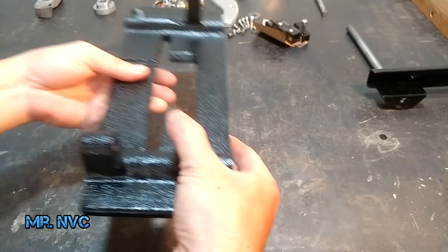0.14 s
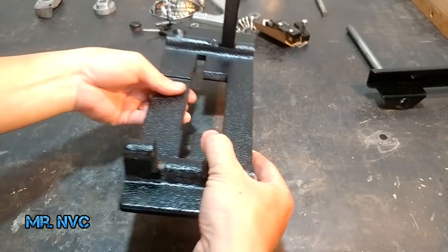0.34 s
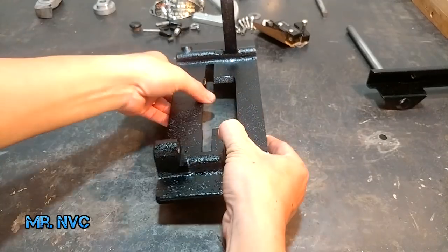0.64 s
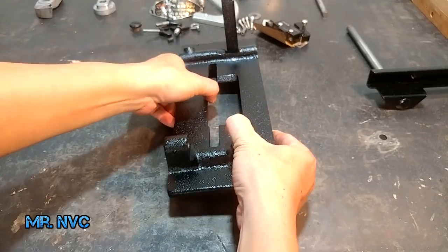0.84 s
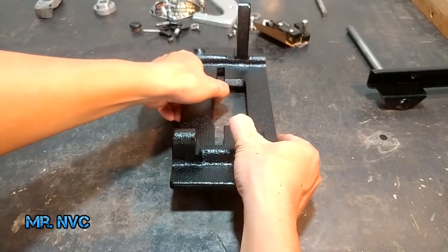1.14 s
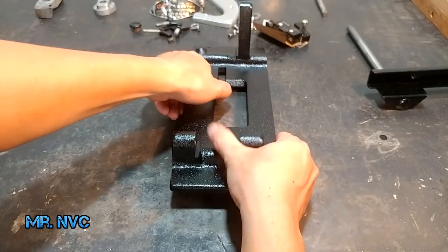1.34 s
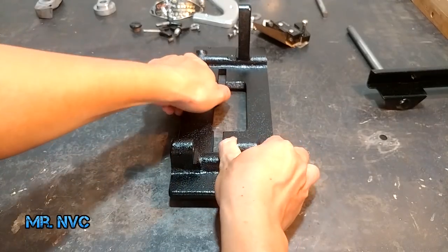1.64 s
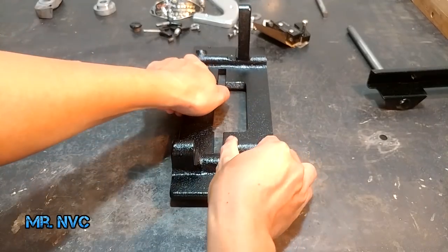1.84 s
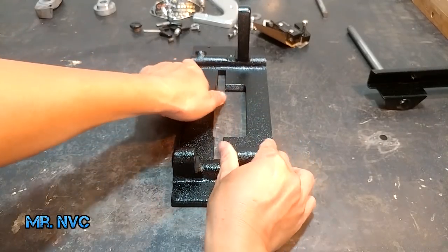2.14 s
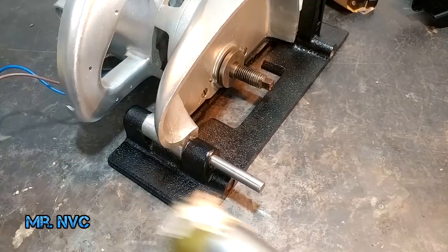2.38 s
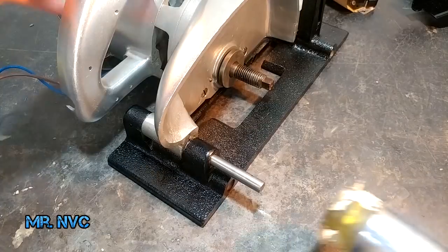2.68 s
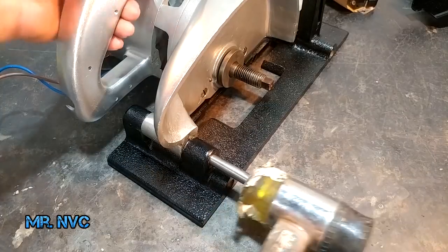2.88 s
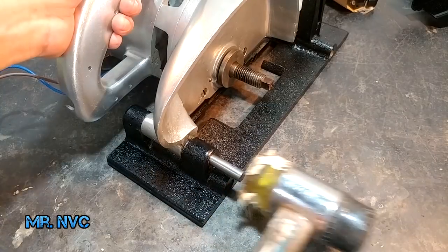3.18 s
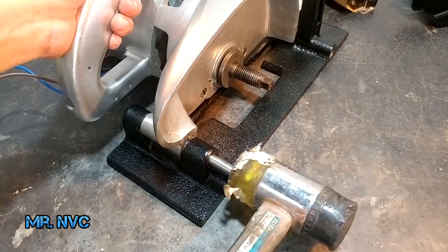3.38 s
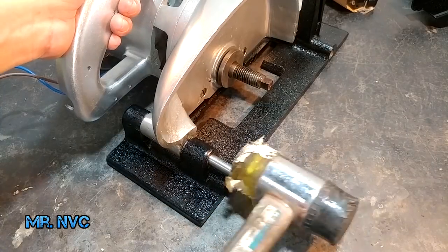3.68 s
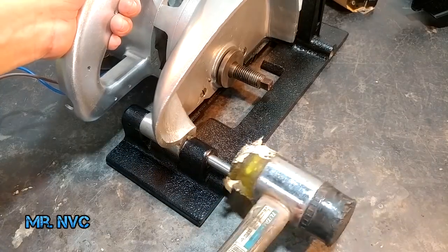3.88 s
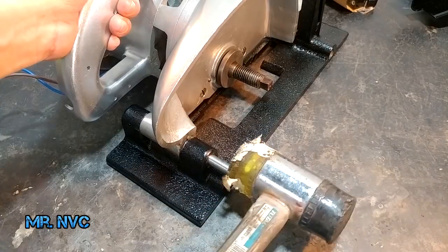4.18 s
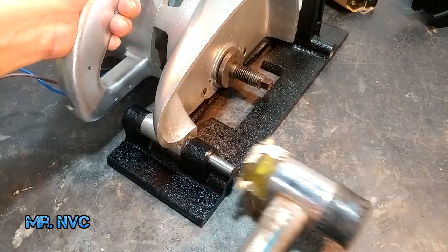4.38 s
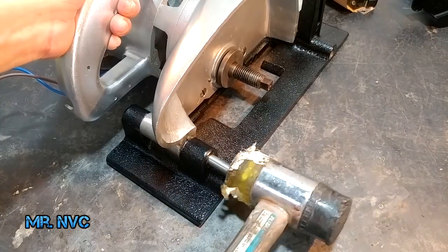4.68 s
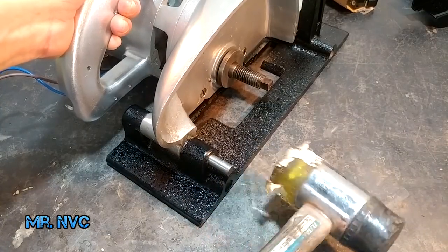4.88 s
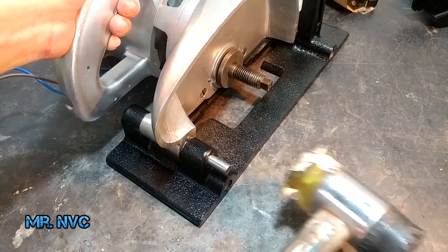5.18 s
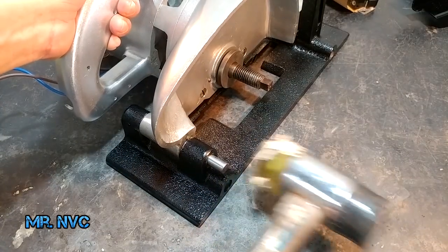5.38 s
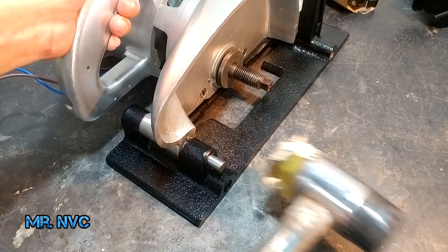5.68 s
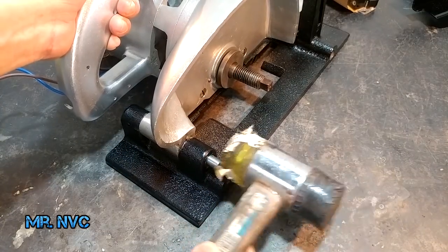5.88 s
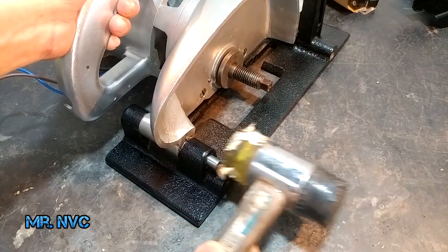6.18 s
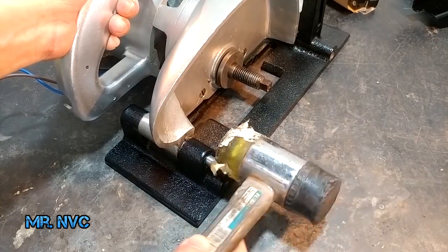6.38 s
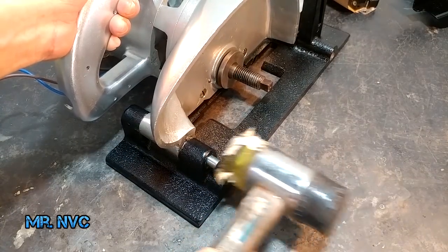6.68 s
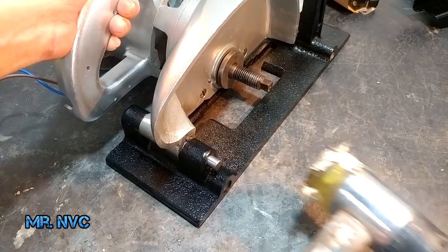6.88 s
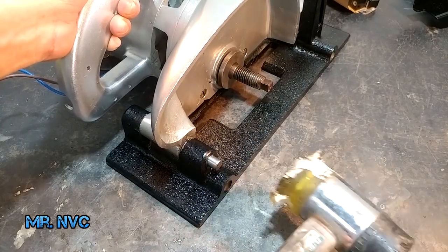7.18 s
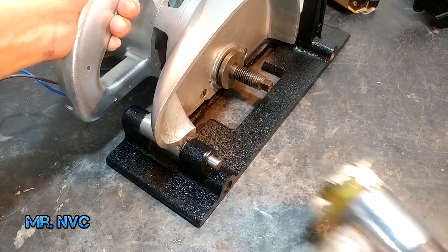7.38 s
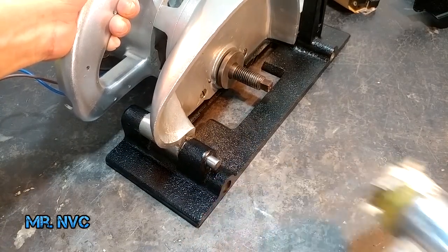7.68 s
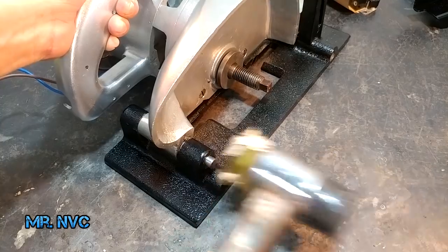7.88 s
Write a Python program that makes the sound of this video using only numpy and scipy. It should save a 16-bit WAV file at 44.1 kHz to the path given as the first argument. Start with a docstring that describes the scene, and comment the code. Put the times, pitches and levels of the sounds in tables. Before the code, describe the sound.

In a small workshop with faint traffic outside, a hinged metal plate scrapes softly and clanks down twice on a bench. After an abrupt cut, a soft-faced mallet taps a loose steel pin, which pings higher with each of the first taps. Firm, steady knocks follow, ringing the cast base. The last heavy blows rattle the whole saw and make the bench boom. The sound is close, with a short room ring.

```python
"""A small workshop, far traffic outside. A cast saw base is handled on the bench; its hinged plate slides
and clanks down twice. After an abrupt cut, a soft-faced mallet drives the steel hinge pin home.
Light blows knock and ring the casting, and the pin pings while still loose. Heavy ones jolt the whole
saw, which rattles and makes the bench boom. The room rings after each; a limiter holds the peaks."""
import sys
import numpy as np
from scipy import signal
from scipy.fft import rfft, irfft, next_fast_len
from scipy.io import wavfile
from scipy.ndimage import uniform_filter1d, minimum_filter1d

SR = 44100
rng = np.random.default_rng(int(sys.argv[2]) if len(sys.argv) > 2 else 0)


def unload_audio(sound):
    """Save the sound as a 16-bit wav file, at the path given as the first command line argument."""
    columns = np.transpose(np.atleast_2d(sound))
    # keep every value between -1 and 1, then stretch to whole-number steps
    steps = np.round(np.clip(columns, -1, 1) * 32767)
    wavfile.write(sys.argv[1], SR, steps.astype(np.int16))


N = 354563
EVENT_SAMPLES = 32768
TIME_S, AGE_S = np.arange(N) / SR, np.arange(EVENT_SAMPLES) / SR
GRIP_S = 4.4   # the bore grips the pin from here on

# Mallet on pin. Each row: start in seconds, knock in dB, ring in dB, ring tilt in dB/octave, jolt 0-1.
BLOWS = [(2.9269, -15, -25.5, .5, 0), (3.197, -17, -31.5, 1, 0), (3.4484, -24, -33, 1, 0),
         (3.7050, -32, -24.5, -2.5, 0.1), (3.9558, -17, -19, -1.5, 0.24), (4.2022, 0, -11.5, 1, 0.5),
         (4.6548, 1.5, -17.5, .5, 0.04), (5.0460, -2, -20, -.5, 0.03), (5.334, -2.5, -21.5, -.5, 0.01),
         (5.6107, -2.5, -24, -0.5, 0), (5.8805, -3.5, -24.5, -.5, 0), (6.1421, -2.5, -21, -1, 0.23),
         (6.3988, -7, -17, 3.5, .54), (6.668, 3, -15, 4, 0.55), (7.5419, -1, -12.5, 1.5, 1),
         (7.9035, 6.5, -11.5, 3, .86)]


def mallet(ripple, contact_s=0.00067, build_s=0.0011, early_db=5.5):
    """Each blow knocks the pin, damped by the mallet face; the casting rings and the saw body thuds."""
    # Each row: mode in Hz, level in dB, t60 in seconds.
    pin_modes = [(573, -10, 0.0096), (960, -12.5, 0.019), (1833, -14.5, 0.023), (2390, -0.5, 0.0096),
                 (2650, -1.5, 0.0072), (3330, -5, 0.0074), (4760, -4.5, 0.0067), (6240, -5.5, 0.0051),
                 (7970, -7, 0.0054)]
    base_modes = [(136, -9.5, 0.43), (285.6, -15, 0.29), (358.3, -8, 0.33), (468, -7.5, 0.31),
                  (657, -19, 0.47), (783, -16, 0.19), (1030, -17, 0.11), (1787, -11.5, 0.25),
                  (2840, -9, 0.22), (3510, -13, 0.25), (5620, -11, 0.14), (7470, -19.5, 0.18)]
    # Each row: frequency in Hz, spectral density in dB.
    casting_spectrum = [(80, -13), (140, -4.5), (220, -5), (500, -0.5), (950, -3), (1300, -4), (1750, -5.5),
                        (2050, -8.5), (2600, -4), (4000, -8.5), (4800, -7), (8200, -6), (10500, -19.5),
                        (16000, -46)]
    thud_spectrum = [(150, -4), (230, -4), (290, 4), (400, -14), (520, 1), (750, 8), (880, 5.5),
                     (1100, -27), (2000, -26)]
    out = np.zeros(N)
    for start_s, knock_db, ring_db, tilt_db, _ in BLOWS:
        knock = struck(pin_modes, spread_db=0.5, detune=0.01) * attack(contact_s)
        ring = room_decay(coloured(resonant_noise(ripple), casting_spectrum, tilt_db))
        ring *= from_db(early_db * decay(0.12))   # near reflections
        ring += from_db(0.5) * struck(base_modes, spread_db=3, detune=0.0025)
        thud = room_decay(coloured(resonant_noise(ripple), thud_spectrum)) * decay(0.52)
        thud *= from_db(0.5 if start_s < GRIP_S else -5)   # stronger while the pin gives way
        body = (ring + thud) * attack(build_s)
        add(out, start_s, from_db(knock_db) * knock + from_db(ring_db) * body)
    return out


def loose_pin(ripple_free_db=5, chime_db=3.5, loss_db_per_tap=3.5):
    """The loose pin chimes in the bore on the first taps and pings higher as its free end shortens."""
    # One pitch per tap.
    pings_hz = [2380, 3560, 4250]
    # Each row: mode in Hz, level in dB, t60 in seconds.
    chime_modes = [(550, -8, 0.045), (880, 0, 0.032), (1950, 3, 0.022), (8080, 4, 0.12), (8650, -4, .08),
                   (8880, -1, 0.12), (9660, -5, .07), (10430, -5, 0.065), (11600, -16, .07)]
    out = np.zeros(N)
    for tap, ((start_s, _, ring_db, *_), hz) in enumerate(zip(BLOWS, pings_hz)):
        ping = from_db(ripple_free_db) * np.sin(2 * np.pi * hz * AGE_S) * decay(0.07)
        chime = from_db(chime_db - loss_db_per_tap * tap) * struck(chime_modes, spread_db=1)
        add(out, start_s, from_db(ring_db) * (ping + chime))
    return out


def jolted_saw(ripple, max_lag_s=0.012, full_rattle_s=0.043):
    """The saw jumps, rattles and rocks the bench; a harder jolt rattles sooner, louder and longer."""
    out = np.zeros(N)
    for start_s, *_, jolt in BLOWS:
        if jolt > 0:
            rattle = iron_clash(ripple, full_rattle_s * jolt, tilt_db=-0.07)
            boom = from_db(-16.5 if start_s < GRIP_S else -13) * bench_boom(hold_s=0.072)
            add(out, start_s + max_lag_s * (1 - jolt ** 2), jolt * (rattle + boom))
    return out


def handled_iron(ripple, full_chatter_s=0.031):
    """Hands clank the loose parts together and rock the base on the bench."""
    # Each row: start in seconds, level in dB, hold in seconds.
    clanks = [(1.1660, -1, 0.022), (1.419, -35, .0024), (1.472, -17, 0.0064), (1.548, -27.5, 0.0046),
              (1.886, -34, 0.0055), (1.904, -32, 0.0044), (2.1042, -22, .002), (2.12, -13, 0.009),
              (2.1330, -10, .037), (6.341, -32.5, 0.0014)]
    rocks = [(1.166, -24, 0.053), (1.485, -22.5, .028), (2.135, -19.5, 0.081), (2.3, -28.5, 0.054)]
    out = np.zeros(N)
    for start_s, level_db, hold_s in clanks:
        tilt_db = 1.35 * np.log2(full_chatter_s / hold_s)   # briefer is thinner
        add(out, start_s, from_db(level_db) * iron_clash(ripple, hold_s, tilt_db))
    for start_s, level_db, hold_s in rocks:
        add(out, start_s, from_db(level_db) * bench_boom(hold_s))
    return out


def iron_clash(ripple, hold_s, tilt_db):
    """A quick run of hard contacts rings the steel plate and fills the room with a bright crash."""
    # Each row: frequency in Hz, spectral density in dB.
    iron_spectrum = [(80, -8), (200, -6), (350, -1), (750, -2), (1400, -3), (2000, -5.5), (3200, -3.5),
                     (4300, -5), (6000, -1), (7900, 2), (9300, -5.5), (11500, -16.5), (16000, -29)]
    # Each row: mode in Hz, level in dB, t60 in seconds.
    plate_modes = [(808, -20, 0.31), (1235, -20, 0.32), (1650, -25, 0.33), (4190, -20, 0.15),
                   (5240, -30, 0.25), (5540, -9, 0.11), (6950, -14, 0.083), (8330, -16.5, 0.37),
                   (8220, -12, 0.16)]
    contacts = impulses(EVENT_SAMPLES, per_s=500)
    ticks = from_db(-14.5) * coloured(contacts, iron_spectrum, tilt_db) * decay(0.077, hold_s)
    crash = room_decay(coloured(resonant_noise(ripple), iron_spectrum, tilt_db), hold_s)
    plate = struck(plate_modes, spread_db=3.5, detune=0.002)
    return (ticks + crash + plate) * attack(0.00022)


def bench_boom(hold_s, settle_t60_s=0.12, room_db=-10.5, room_t60_s=1.0):
    """The rocking base drives the bench top's low modes until it settles; a weak boom lingers."""
    # Each row: mode in Hz, level in dB, t60 in seconds.
    bench_modes = [(95, -0.5, 0.21), (135.6, 5.5, 0.62), (202.4, -1.5, 0.18)]
    drive = rng.standard_normal(EVENT_SAMPLES)
    boom = irfft(rfft(drive) * rfft(struck(bench_modes, detune=0.0129)))
    boom /= np.sqrt(uniform_filter1d(boom ** 2, size=1300) + 1e-9)   # even strength
    envelope = decay(settle_t60_s, hold_s) + from_db(room_db) * decay(room_t60_s)
    return boom * envelope * attack(0.00084)


def plate_slide():
    """Tiny slips of the pushed plate over the rough casting excite its resonances."""
    # Each row: mode in Hz, level in dB, t60 in seconds.
    slide_modes = [(530, -3, .025), (799, -1, 0.071), (1165, -1, 0.022), (1610, -0.5, 0.017),
                   (2300, 3.5, 0.0081), (7690, -19, .22)]
    # Each row: middle in seconds, level in dB, half length in seconds.
    pushes = [(0.727, -42.5, 0.12), (1.03, -35.5, 0.073), (2.33, -35, 0.055)]
    scrape = signal.fftconvolve(impulses(N, per_s=900), struck(slide_modes))[:N]
    envelope = sum(from_db(db) * bell_curve(middle_s, half_s) for middle_s, db, half_s in pushes)
    return rms_one(scrape) * envelope


def settling_saw():
    """Low rumble as the saw is steadied."""
    # Each row: frequency in Hz, spectral density in dB.
    spectrum = [(30, -11), (50, -1), (85, 2), (115, -19), (200, -27), (600, -50), (2000, -90)]
    return from_db(-42.5) * bell_curve(middle_s=2.5, half_s=0.13) * steady_noise(spectrum)


def mode_ripple(spacing_hz=30, spread_db=1.8):
    """Crowded resonances of casting and room: one uneven spectral gain shared by all impacts."""
    knots_db = spread_db * rng.standard_normal(4000)
    hz = np.fft.rfftfreq(EVENT_SAMPLES, 1 / SR)
    return from_db(np.interp(hz / spacing_hz, np.arange(len(knots_db)), knots_db))


def room_decay(noise, hold_s=0):
    """Dense modes die away in the room, octave by octave, the lows last."""
    # Each row: frequency in Hz, t60 in seconds.
    room_t60 = [(100, 0.75), (300, 0.59), (700, 0.34), (2000, 0.34), (7000, 0.26), (15000, 0.19)]
    spectrum, centres_hz = rfft(noise), np.geomspace(100, 15000, 8)
    hz = np.fft.rfftfreq(EVENT_SAMPLES, 1 / SR)
    band_position = np.interp(np.log(hz + 1), np.log(centres_hz), np.arange(len(centres_hz)))
    out = np.zeros(EVENT_SAMPLES)
    for k, centre_hz in enumerate(centres_hz):
        band = irfft(spectrum * np.maximum(1 - abs(band_position - k), 0))
        out += band * decay(at_hz(room_t60, centre_hz), hold_s)
    return out


def far_traffic(drone_hz=101.6, waver=0.0074):
    """Rumble, rush and a wavering drone swell and fade as traffic passes."""
    # Each row: frequency in Hz, spectral density in dB.
    rumble_spectrum = [(15, -36), (25, -19.5), (48, 4), (114, -2), (211, 1.5), (267, -2), (303, -3.5),
                       (330, -7.5), (401, -9), (430, -11), (700, -20.5), (910, -40), (1540, -120)]
    rush_spectrum = [(240, -32), (400, -8), (621, -10.5), (780, -9.5), (2790, -18.5), (5030, -28),
                     (7580, -25), (10400, -41), (15000, -45)]
    phase = 2 * np.pi * np.cumsum(drone_hz * (1 + waver * wander(per_s=10))) / SR
    drone = sum(np.sin(k * phase) for k in (2, 3, 4))
    return (from_db(-28) * pass_by(peak_s=1.38, half_s=0.69) * steady_noise(rumble_spectrum)
            + from_db(-37) * pass_by(peak_s=1.17, half_s=0.54) * steady_noise(rush_spectrum)
            + from_db(-33.5) * pass_by(peak_s=1.82, half_s=0.12) * drone)


def workshop_air(hum_hz=144, whine_s=0.2, whine_top_hz=14700, whine_drop_hz=2800):
    """Steady hiss, a wavering hum and a few faint, flickering whines that rise and fall."""
    # Each row: frequency in Hz, spectral density in dB.
    air_spectrum = [(30, -35), (50, 2), (80, 1.5), (110, -10), (145, -4.5), (190, -11.5), (450, -18),
                    (1100, -21.5), (2100, -26), (5500, -28), (7500, -24), (9000, -27.5), (10500, -36),
                    (16000, -43.5)]
    whine_starts_s = [3.55, 3.79, 4.03, 5.70, 5.97]
    hum = from_db(-48) * np.sin(2 * np.pi * hum_hz * TIME_S + wander(per_s=9))
    hum *= 1 + 0.6 * wander(per_s=9.9)
    arch = np.linspace(-1, 1, int(whine_s * SR))
    pitch_hz = whine_top_hz - whine_drop_hz * arch ** 2
    whine = np.zeros(N)
    for start_s in whine_starts_s:
        add(whine, start_s, np.sin(2 * np.pi * np.cumsum(pitch_hz) / SR) * np.sqrt(1 - arch ** 2))
    whine *= from_db(-56) * wander(per_s=120)
    return from_db(-41.5) * steady_noise(air_spectrum) + hum + whine


def struck(modes, spread_db=0, detune=0):
    """Damped sines of alternating sign, with random scatter in level and pitch."""
    out = np.zeros(EVENT_SAMPLES)
    for k, (hz, db, t60_s) in enumerate(modes):
        gain = (-1) ** k * from_db(db + spread_db * rng.standard_normal())
        pitch_hz = hz * (1 + detune * rng.standard_normal())
        out += gain * np.sin(2 * np.pi * pitch_hz * AGE_S) * decay(t60_s)
    return out


def impulses(samples, per_s):
    """Contacts at random times and strengths."""
    return (rng.random(samples) < per_s / SR) * rng.standard_normal(samples)


def resonant_noise(ripple):
    """Fresh noise through the crowded resonances."""
    return irfft(rfft(rng.standard_normal(EVENT_SAMPLES)) * ripple)


def steady_noise(spectrum):
    """Scene-long coloured noise; rms 1."""
    return coloured(rng.standard_normal(next_fast_len(N)), spectrum)[:N]


def coloured(noise, spectrum, tilt_db=0):
    """Noise shaped to a spectrum, tilted by tilt_db per octave about 2 kHz; rms 1."""
    hz = np.fft.rfftfreq(len(noise), 1 / SR)
    octaves = np.log2(np.maximum(hz, 200) / 2000)
    gain = from_db(at_hz(spectrum, hz) + tilt_db * octaves) * (hz > 20)
    return rms_one(irfft(rfft(noise) * gain, len(noise)))


def attack(rise_s):
    return 1 - np.exp(-AGE_S / rise_s)


def decay(t60_s, hold_s=0):
    return np.exp(-np.log(1000) * np.maximum(AGE_S - hold_s, 0) / t60_s)


def bell_curve(middle_s, half_s):
    return np.exp(-((TIME_S - middle_s) / half_s) ** 2)


def pass_by(peak_s, half_s):
    """1/distance gain of a straight pass; 3 dB down half_s from the peak."""
    return 1 / np.hypot(1, (TIME_S - peak_s) / half_s)


def wander(per_s):
    """Random values joined by straight lines; spread about 1."""
    knots = rng.standard_normal(1000)
    return np.interp(TIME_S * per_s, np.arange(len(knots)), knots)


def at_hz(points, hz):
    """Read a table on a log-frequency axis."""
    knots_hz, values = np.array(points).T
    return np.interp(np.log(hz + 1), np.log(knots_hz), values)


def from_db(db):
    return 10 ** (np.asarray(db) / 20)


def rms_one(x):
    return x / np.sqrt(np.mean(x ** 2) + 1e-20)


def add(out, start_s, sound):
    at = round(start_s * SR)
    out[at:at + len(sound)] += sound[:N - at]


def scene(cut_s=2.351, air_fade_s=0.2):
    """Handling up to the cut, hammering after it; mono."""
    ripple = mode_ripple()
    impacts = mallet(ripple) + loose_pin() + jolted_saw(ripple) + handled_iron(ripple)
    air = workshop_air()
    handling = impacts + plate_slide() + far_traffic() + from_db(-3) * air
    blows = impacts * (TIME_S > BLOWS[0][0] - 0.01)   # mutes the handling tails until the first blow
    fade_in = 1 - np.exp(-np.maximum(TIME_S - cut_s, 0) / air_fade_s)
    hammering = blows + settling_saw() + air * fade_in
    return np.where(TIME_S < cut_s, handling, hammering)[None]


def record(dry, ceiling=0.98, release_db_per_s=598.0, low_cut_hz=27, high_cut_hz=16000):
    """Fast peak limiter, then low and high cuts."""
    over_db = 20 * np.log10(np.maximum(abs(dry[0]) / ceiling, 1))
    release_db = release_db_per_s * TIME_S
    held_db = np.maximum.accumulate(over_db + release_db) - release_db
    gain_db = uniform_filter1d(minimum_filter1d(-held_db, size=21), size=21)
    low_cut = signal.butter(4, low_cut_hz, "high", fs=SR, output="sos")
    high_cut = signal.ellip(12, 0.1, 80, high_cut_hz, fs=SR, output="sos")
    return signal.sosfilt(high_cut, signal.sosfilt(low_cut, dry * from_db(gain_db)))


dry = scene()
out = record(dry)
unload_audio(out)
```